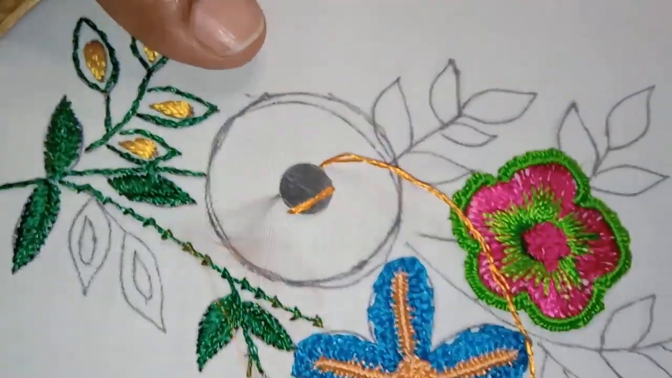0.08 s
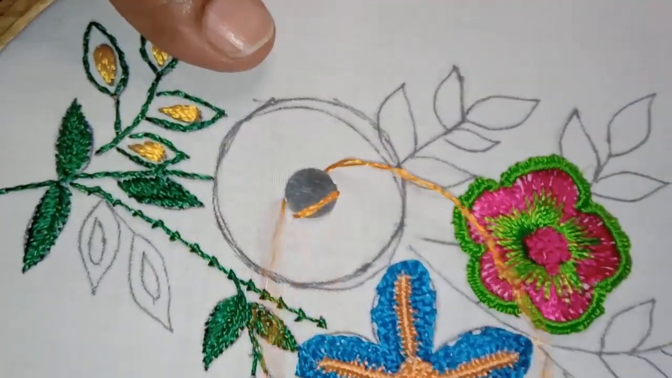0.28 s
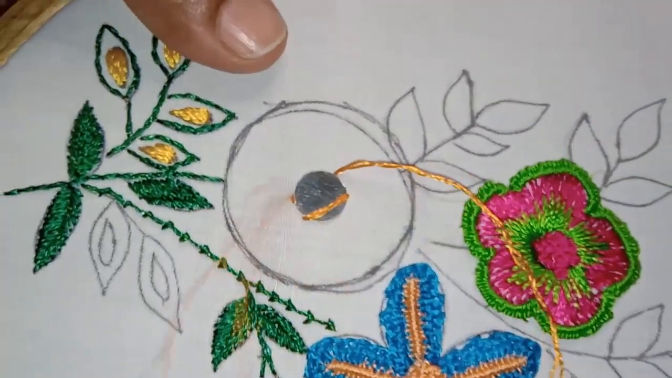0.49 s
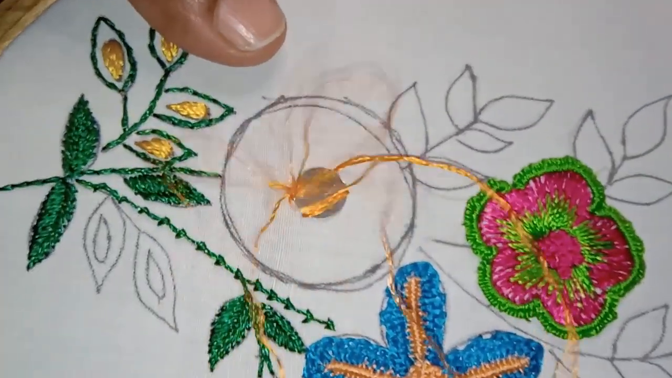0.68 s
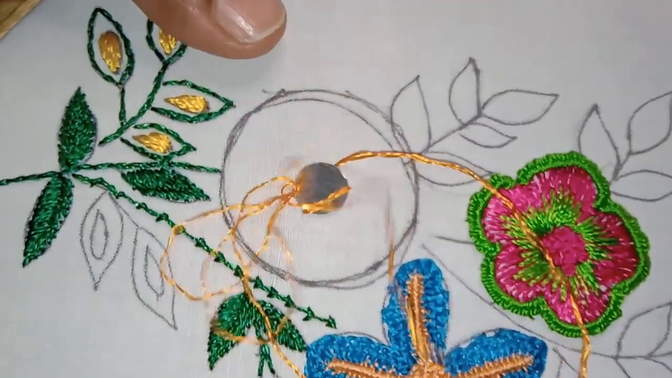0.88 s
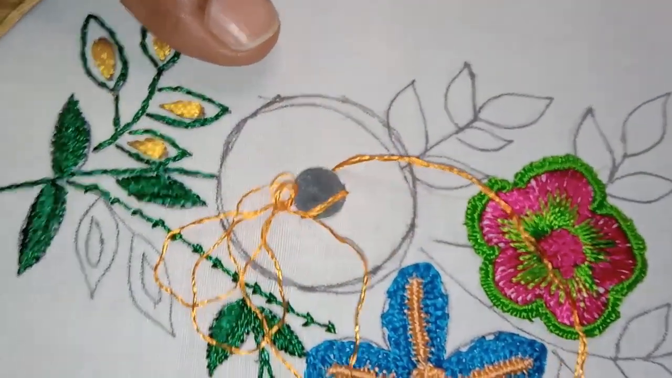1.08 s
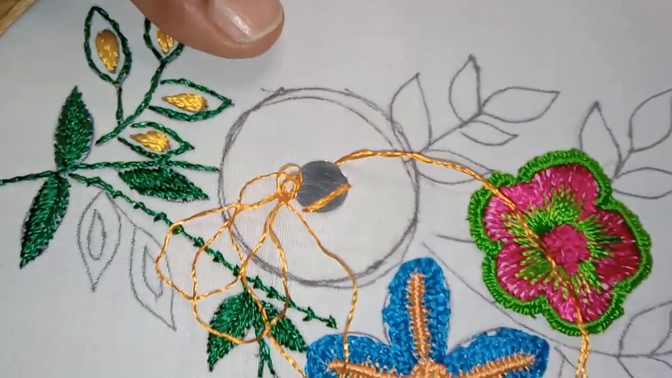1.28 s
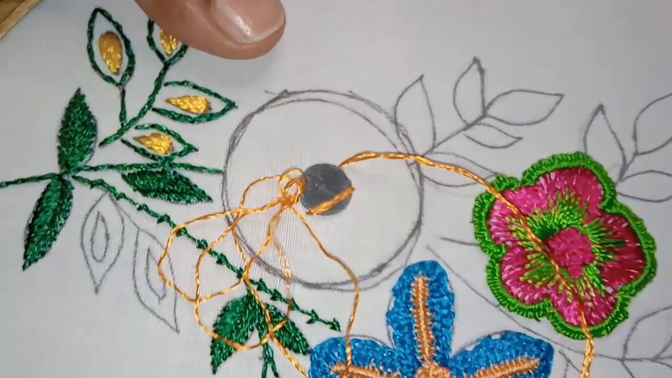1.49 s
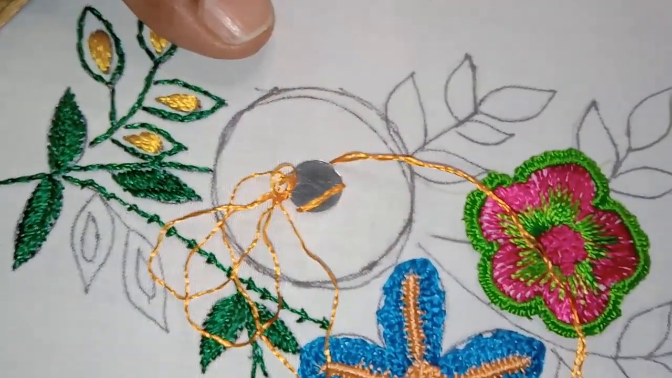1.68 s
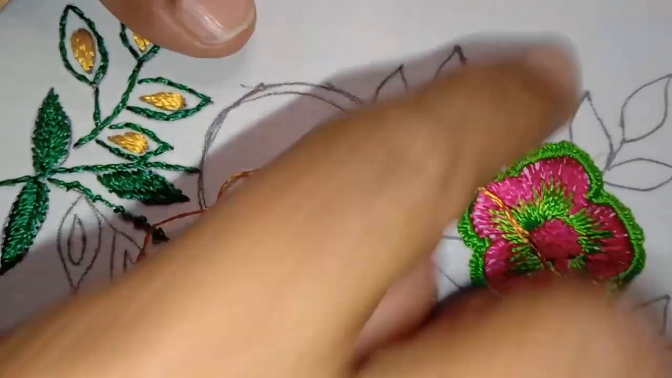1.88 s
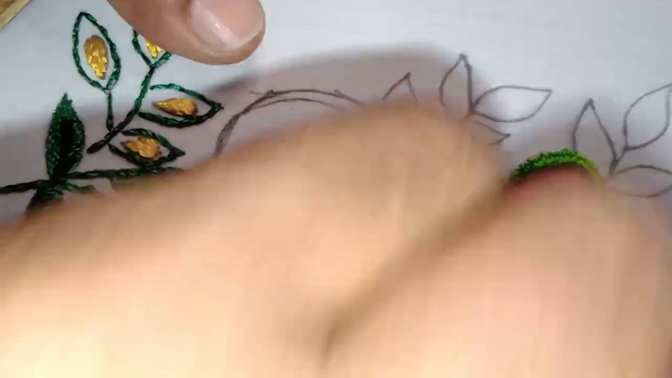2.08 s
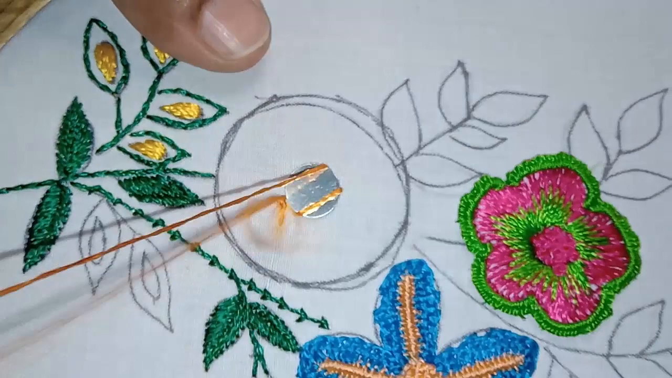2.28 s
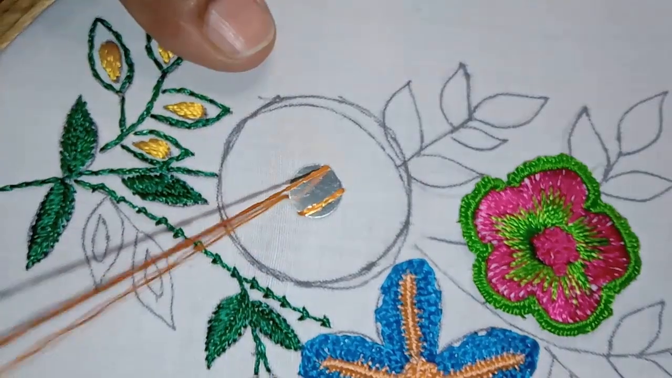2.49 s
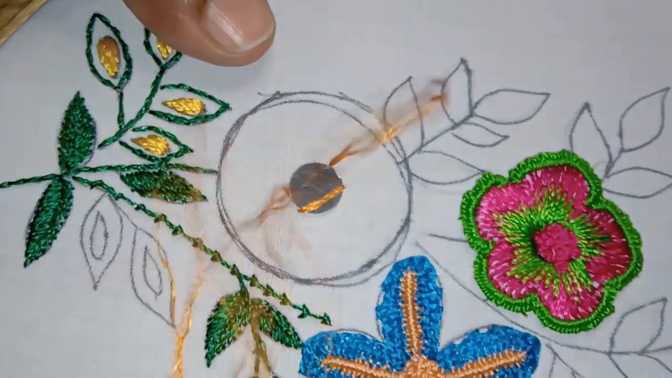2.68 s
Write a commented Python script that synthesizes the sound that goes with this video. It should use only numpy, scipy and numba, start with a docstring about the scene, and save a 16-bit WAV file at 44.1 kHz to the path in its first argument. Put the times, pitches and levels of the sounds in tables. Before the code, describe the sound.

Thread rasps through taut cloth, close to the microphone, with a dull knock and a faint thin whistle. Loose loops rustle softly in a pause, then a second scraping pull drums the fabric in a quiet room.

```python
"""Two close, rasping pulls of thread through cloth stretched in a hoop: hand sewing beside a phone.
Fibres catch and slip in the weave, drumming the taut cloth, scraping and hissing; on the first pull the
thread's twist whistles at speed. The cloth is knocked a few times and loose loops rustle in between.
Behind it lies a quiet room with a thin tone and narrow bands of hiss."""
import sys
import numpy as np
from scipy import signal
from scipy.fft import rfft, irfft
from scipy.io import wavfile
from scipy.ndimage import uniform_filter1d
from numba import njit

SR = 44100
rng = np.random.default_rng(int(sys.argv[2]) if len(sys.argv) > 2 else 0)


def put_to_file(sound):
    """Save the sound as 16-bit audio at rate SR, in the file named by the first command-line argument."""
    columns = np.atleast_2d(sound).T  # one column per channel
    safe = np.clip(columns, -1, 1)
    whole_steps = np.round(safe * 32767)
    wavfile.write(sys.argv[1], SR, whole_steps.astype(np.int16))


N = 119070


def rubbing():
    """Thread and hand rub the cloth: its drum note follows the tension while fibres scrape and hiss."""
    # The pulls. Each row: time in seconds, drumming in dB, lowest cloth mode in Hz,
    # upper modes in dB, scrape in dB, hiss in dB.
    rubs = [ (0.0, -57, 149.6, -70, -56, -45.5), (0.088, -83, 166, -87, -66, -53.5),
            (0.134, -49.5, 174.5, -63, -68, -60.5), (0.172, -70, 191, -73, -74, -65),
            (0.195, -60, 199.5, -84, -78, -74), (0.221, -30.5, 187, -43.5, -52, -56),
            (0.241, -33, 183.1, -48, -52, -63), (0.273, -50, 179, -60, -61, -51.5),
            (0.308, -29.5, 224.2, -35.5, -43, -46), (0.35, -32.5, 163.1, -39.5, -43.5, -48.5),
            (0.402, -38.5, 181.8, -52.5, -49.5, -43.5), (0.442, -37, 191, -44.5, -46.5, -42),
            (0.574, -42, 191.5, -45.5, -50.5, -44.5), (0.654, -64, 272.1, -45, -44, -46.5),
            (0.762, -38, 199.6, -43, -48.5, -47), (0.818, -42, 214.6, -42, -48.5, -54.5),
            (0.842, -48.5, 198, -56, -62.5, -58), (0.874, -47, 168.7, -55.5, -52.5, -52),
            (0.94, -54, 176.2, -54.5, -60, -58), (0.945, -55, 231, -51, -39.5, -53.5),
            (1.027, -51.5, 241, -69, -51.5, -65.5), (1.061, -68, 230.4, -88, -63, -84),
            (1.111, -59, 233, -82.5, -75, -87), (1.17, -99, 190.5, -94, -67, -76),
            (1.38, -95, 177.9, -73.5, -75.5, -76), (1.94, -88.5, 159.2, -81.5, -76, -65),
            (1.952, -45, 163, -76, -89, -69), (1.97, -33.5, 155.1, -92, -54, -65),
            (2.018, -48, 169.7, -44, -54, -46.5), (2.056, -41, 217, -48, -45, -48),
            (2.066, -42, 206, -37.5, -55, -54), (2.096, -41.5, 192.6, -66, -75, -74),
            (2.14, -64, 198, -54, -75, -89.5), (2.203, -58, 193.7, -50, -69.5, -89),
            (2.283, -77, 288, -45.5, -59.5, -68), (2.313, -32.5, 264.4, -33, -52, -61.5),
            (2.345, -31.5, 239, -35, -52.5, -59.5), (2.375, -36.5, 232.7, -35.5, -46.5, -48),
            (2.409, -36, 225.5, -36.5, -47.5, -51.5), (2.471, -37.5, 164.5, -41.5, -53, -70),
            (2.549, -47.5, 216, -52, -57, -82), (2.61, -70, 218, -69, -105, -94),
            (2.644, -80, 212, -58.5, -81, -71), (2.654, -84, 207.8, -73, -85, -64),
            (2.68, -53.5, 205.3, -49, -53, -50.5), (2.7, -53, 205.9, -50.5, -57, -54)]
    # Colours of the midrange scrape and the bright hiss. Each row: frequency in Hz, density in dB.
    scrape_colour = [(410, -27), (700, -6), (846, -23), (901, -1.5), (1170, 6.5), (1280, 6), (1550, 4),
                     (2040, 9.5), (2550, 1), (3410, 0.5), (4290, -25), (4600, -3), (5980, -43)]
    hiss_colour = [(2350, -2.5), (4000, -3), (4390, -9), (5100, 2), (6330, 1), (6950, -6), (8160, -17.5),
                   (8870, -16), (10000, -10), (15000, -20), (16000, -63.5)]
    push, grain = fibres(), fibres()
    pitch = track(rubs, 2, rest=180)
    note = unit(moving_band(push, pitch, width=16.3))
    body = unit(band(band(band(push, 210, 315), 210, 315), 210, 315))
    drum = undb(track(rubs, 1)) * unit(note + undb(-0.5) * body)
    upper = undb(track(rubs, 3)) * unit(band(band(cloth_modes(push), 430, 950), 455, 1147.4))
    scrape = undb(track(rubs, 4)) * colour(grain, scrape_colour)
    ring = thread_ring(grain)
    hiss = undb(track(rubs, 5)) * colour(fibres(), hiss_colour)
    return drum + upper + scrape + ring + hiss


def fibres(flicker_db=3):
    """Fibres catch and slip: clicks of uneven size over a smooth rub."""
    catches_per_s, spread_db, most_db, smooth_share = 2500, 3.5, 14.5, 0.47
    size_db = np.minimum(spread_db * rng.exponential(size=N), most_db)
    catches = (rng.random(N) < catches_per_s / SR) * undb(size_db) * rng.choice([-1, 1], N)
    friction = np.sqrt(smooth_share) * rng.standard_normal(N) + np.sqrt(1 - smooth_share) * unit(catches)
    return friction * undb(flicker_db * walk(39.816))


def cloth_modes(push):
    """A push rings the upper modes of the stretched cloth, like a drumhead."""
    # Each row: frequency in Hz, width in Hz, gain in dB.
    modes = [(322, 124, 5), (495.3, 89, 5.5), (573.6, 29, 7.5), (747, 19, -4), (898, 37, 0), (586, 230, -7)]
    return sum(undb(db) * band(push, hz, width) for hz, width, db in modes)


def thread_ring(grain):
    """Friction rings the taut thread; each resonance wavers in pitch and level."""
    # The thread's resonances. Each row: frequency in Hz, width in Hz, relative level in dB.
    resonances = [(1142, 86, -13), (1385.7, 110, -4.5), (2060, 70, -9), (2760, 78, -8.5), (3210, 79, -13),
                  (3638, 170, -9.5), (5280, 160, -21.5)]
    # How it rings. Each row: time in seconds, level in dB, tilt toward the treble in dB per octave.
    strength = [(.3, -84, -6.5), (.38, -55.5, 12), (.8, -66, -0.5), (.86, -73, -4), (2.12, -81.5, -7),
                (2.19, -62.5, -14), (2.27, -48.5, -9.5), (2.35, -51, -5), (2.39, -49.5, 4.5),
                (2.48, -57, 13), (2.54, -61.5, 7.5), (2.58, -85, 3)]
    tilt, pivot_hz = track(strength, 2, rest=0), resonances[2][0]
    ring = 0
    for hz, width, db in resonances:
        gain = undb(db + 3 * walk(16) + tilt * np.log2(hz / pivot_hz))
        resonance = band(grain, hz * (1 + 0.014 * walk(8.8)), width)
        ring += gain * unit(band(resonance, hz, 3 * width))
    return undb(track(strength, 1)) * ring


def whistle():
    """The thread's twist passes the weave: a thin, unsteady line whose pitch follows the pulling speed."""
    # Each row: time in seconds, pitch in Hz, level in dB.
    glide = [(.45, 3290, -60), (.478, 3370, -45), (.5, 3510, -48), (.53, 3565, -47), (.545, 3700, -68),
             (.58, 3870, -50), (.62, 3740, -57), (.658, 3540, -45), (.7, 3420, -64), (.73, 3310, -42),
             (.77, 3130, -62)]
    hz = track(glide, 1, rest=5300) * (1 + 0.00344 * walk(70))
    return undb(track(glide, 2) + 2 * walk(61.6)) * sine(hz)


def knocks():
    """Each knock on the cloth rings a low thump, pushes the upper modes and adds a click."""
    # Each row: start in seconds, thump in dB, thump pitch in Hz, its t60 in seconds,
    # upper modes in dB, click in dB.
    hits = [(.121, -48, 156, 0.065, -69, -51), (0.218, -30, 230, 0.08, -54, -40),
            (0.229, -33, 172, 0.2, -47, -52), (.3, -48, 200, 0.045, -35, -46),
            (0.309, -25.5, 166, 0.16, -47, -57), (0.327, -67, 181, 0.065, -20.5, -9),
            (.334, -8, 153, 0.042, -50, -54), (0.344, -35.5, 94.9, 0.33, -59, -64),
            (0.357, -25.5, 161, 0.078, -59.5, -47.5), (1.954, -50, 320, 0.034, -38, -70),
            (1.959, -23.5, 93.6, 0.1, -33, -45), (2.06, -36, 467, 0.0615, -21.5, -52),
            (2.139, -67, 250, 0.046, -43, -58), (2.306, -43, 280, 0.17, -24.5, -59),
            (2.353, -58, 252, 0.078, -26, -24)]
    # Modes of the click. Each row: frequency in Hz, relative level in dB, t60 in seconds.
    click_modes = [(739, 4, 0.022), (1283, 4, 0.013), (2011, 4, 0.0074), (2685, -21, 0.004),
                   (4800, -10, 0.0061), (6760, -17.5, 0.011)]
    push_s, sharp, settle_s = 0.0015, 0.3, 0.0074
    out, t = np.zeros(N), np.arange(SR // 4) / SR
    upper = cloth_modes(np.sin(np.pi * np.clip(t / push_s, 0, 1)))
    click = sum(np.sin(2 * np.pi * hz * t) * undb(db - 60 * t / t60) for hz, db, t60 in click_modes)
    bent_time = t + sharp * settle_s * (1 - np.exp(-t / settle_s))  # a thump starts sharp and settles
    for start, db, hz, t60, upper_db, click_db in hits:
        thump = np.sin(2 * np.pi * hz * bent_time) * undb(db - 60 * t / t60)
        hit = thump + undb(upper_db) * upper / abs(upper).max() + undb(click_db) * click / click.max()
        i = int(start * SR)
        out[i:i + len(t)] += hit[:N - i]
    return out


def rustles():
    """Loose loops of thread rustle in short bursts of fibre noise."""
    # Each row: start, attack, hold and release t60 in seconds, level in dB, centre and width in Hz.
    bursts = [(0.1259, 0.0018, 0.00112, 0.016, -43.5, 3000, 3280),
              (0.357, .001, 0.0025, .02, -53.5, 2010, 2500), (0.491, 0.008, 0.019, .04, -51.5, 9800, 3060),
              (0.805, 0.0022, .006, 0.042, -54.5, 9200, 12000),
              (1.4244, 0.00089, 0.01, 0.029, -42, 6460, 15800),
              (1.45, 0.0012, 0.0031, 0.014, -50, 6500, 2570),
              (1.456, 0.0182, 0.0091, 0.11, -56.5, 8400, 8000),
              (1.562, 0.03, 0.011, 0.097, -50, 8300, 9300),
              (1.9934, 0.0006, 0.00089, 0.014, -44.5, 5400, 5000),
              (2.317, .002, 0.00345, .03, -52.5, 2780, 2970),
              (2.361, 0.0016, 0.002, 0.0093, -36, 6740, 12200)]
    # Colour of the loose thread. Each row: frequency in Hz, density in dB.
    loop_colour = [(290, -36), (1300, -4), (2080, -22), (3040, -12), (4500, -32), (5280, -6), (5760, -11),
                   (7060, -4), (8290, -27), (10300, -12), (14200, -18), (16200, -18)]
    out, t = np.zeros(N), np.arange(N) / SR
    grain = colour(fibres(flicker_db=0), loop_colour)
    for start, attack, hold, t60, db, hz, width in bursts:
        rise = np.clip((t - start) / attack, 0, 1)
        release_db = 60 * np.clip(t - start - attack - hold, 0, None) / t60
        out += rise * undb(db - release_db) * unit(band(band(grain, hz, width), hz, width))
    return out


def room():
    """A quiet noise floor, a thin wavering tone and narrow bands of hiss that come and go."""
    # Colour of the floor. Each row: frequency in Hz, density in dB.
    floor_colour = [(15, -42.5), (25, -1.5), (237, 0), (319, -12.5), (1020, -13.5), (1340, -5.5),
                    (1490, -26), (1850, -22), (4410, -19), (6450, -26.5), (8230, -20), (13000, -17.5),
                    (16200, -59.5)]
    # Swells of the tone and of the hiss. Each row: time in seconds, level in dB.
    tone_level = [(0, -100), (1.1, -72.5), (1.25, -68), (1.37, -64.5), (1.6, -71.5), (1.76, -62.5),
                  (1.9, -77.5), (2.6, -66), (2.7, -68)]
    hiss_level = [(0, -69), (1.1, -80), (1.2, -72.5), (1.3, -80.5), (1.5, -69.5), (1.65, -77),
                  (1.72, -66.5), (1.9, -68), (2.2, -78), (2.7, -76)]
    # The bands of hiss. Each row: centre in Hz, width in Hz, relative level in dB.
    hiss_bands = [(1737, 80, -12.5), (3794, 36, -9), (5104, 71, -7), (6356, 100, -3.5), (6726, 400, 2.5)]
    floor_db, tone_hz = -72, 1353.5
    floor = undb(floor_db + 2.1 * walk(8)) * colour(rng.standard_normal(N), floor_colour)
    tone = undb(track(tone_level, 1) + 3.5 * walk(19)) * sine(tone_hz + 12 * walk(40))
    hiss = 0
    for hz, width, db in hiss_bands:
        gain = undb(db + 6.1 * walk(9.6))
        drifting = band(rng.standard_normal(N), hz * (1 + 0.0045 * walk(13)), width)
        hiss += gain * unit(band(drifting, hz, 2 * width))
    return floor + tone + undb(track(hiss_level, 1)) * hiss


def stereo_side(near):
    """What differs left and right: room air and a late, brightened trace of the sewing."""
    # Colour of the air. Each row: frequency in Hz, density in dB.
    air_colour = [(18, -42), (30, -22), (241, -5.5), (827, -12.5), (1350, -5.5), (1530, -8), (4290, -13),
                  (6470, -8.5), (8370, -21.5), (14000, -23)]
    air_db, trace_db, delay_samples = -75.5, -53.5, 180
    air = undb(air_db + 9 * walk(10.47)) * colour(rng.standard_normal(N), air_colour)
    bright = near + 4 * band(near, 8930, 9000)
    return air + undb(trace_db) * np.roll(bright, delay_samples)


def undb(db):
    return 10 ** (np.asarray(db) / 20)


def unit(x):
    return x / np.sqrt(np.mean(x ** 2))


def sine(hz):
    return np.sin(2 * np.pi * np.cumsum(hz) / SR)


def track(rows, col, rest=-120):
    """One column of a table along time; before and after it the value is rest."""
    rows = np.array(rows, float)
    return np.interp(np.arange(N) / SR, rows[:, 0], rows[:, col], left=rest, right=rest)


def colour(x, points):
    """Shape a noise to (Hz, dB) points, at unit RMS."""
    hz, db = np.array(points, float).T
    bin_hz = np.arange(N // 2 + 1) * SR / N
    curve_db = np.interp(np.log(bin_hz + 1), np.log(hz), db, left=-90)
    return unit(irfft(rfft(x) * undb(curve_db), N))


@njit
def moving_band(x, hz, width):
    """State-variable band-pass whose centre may move each sample."""
    y, mid, low = np.empty(len(x)), 0., 0.
    for i in range(len(x)):
        g, damping = np.tan(np.pi * hz[i] / SR), width / hz[i]
        v = (mid + g * (x[i] - low)) / (1 + g * (g + damping))
        mid, low = 2 * v - mid, low + 2 * g * v
        y[i] = damping * v
    return y


def band(x, hz, width):
    return moving_band(x, hz * np.ones(len(x)), float(width))


def walk(rate):
    """A smooth wander: random levels held 1 / rate seconds and slewed twice."""
    hold = int(SR / rate)
    steps = np.repeat(rng.standard_normal(N // hold + 1), hold)
    return 0.83 * uniform_filter1d(uniform_filter1d(steps, hold), hold)[:N]


def scene():
    """Close sewing over the quiet room, nearly mono."""
    near = rubbing() + whistle() + knocks() + rustles()
    centre = near + room()
    side = stereo_side(near)
    return np.array([centre + side, centre - side])


def record(dry):
    """The phone thins the bass and cuts the top."""
    low_hz, top_hz = 54.8, 16000
    thin = signal.sosfilt(signal.butter(2, low_hz, "high", fs=SR, output="sos"), dry)
    return signal.sosfilt(signal.ellip(10, .2, 80, top_hz, fs=SR, output="sos"), thin)


dry = scene()
out = record(dry)
put_to_file(out)
```